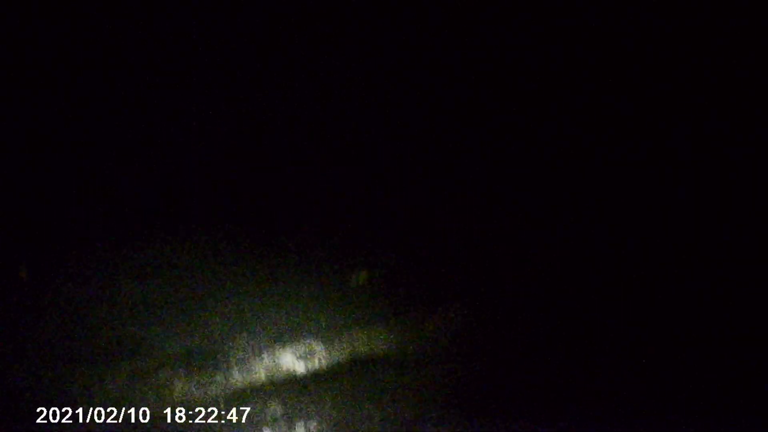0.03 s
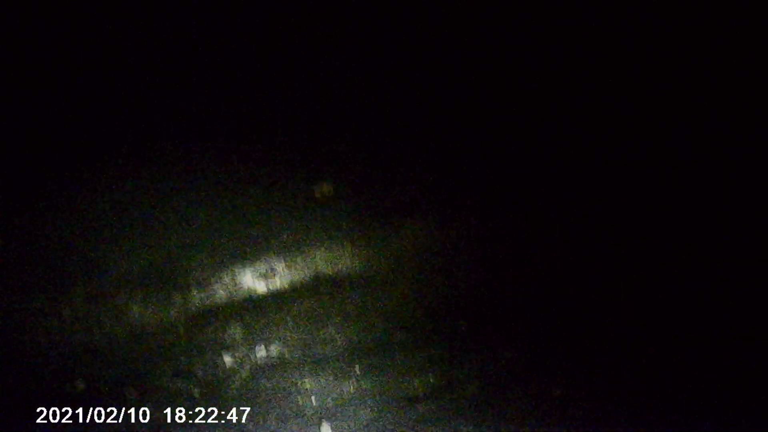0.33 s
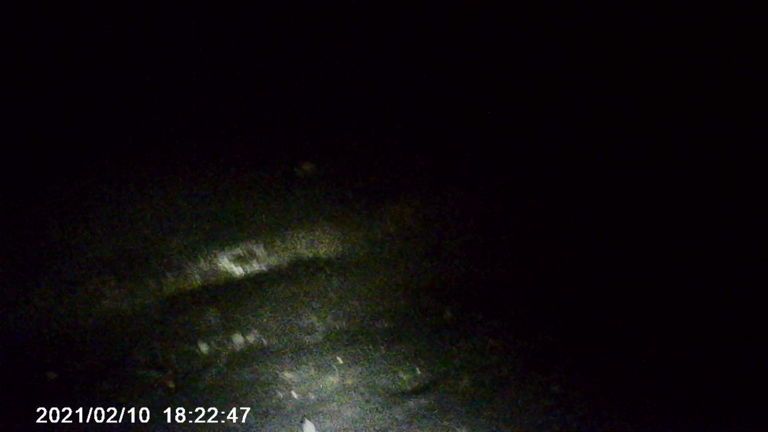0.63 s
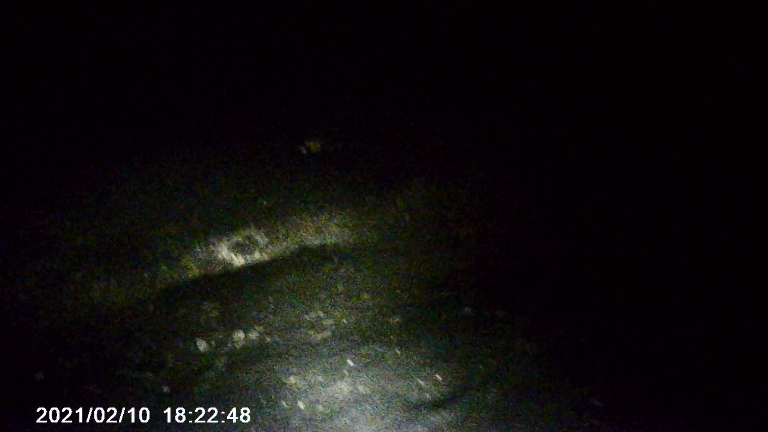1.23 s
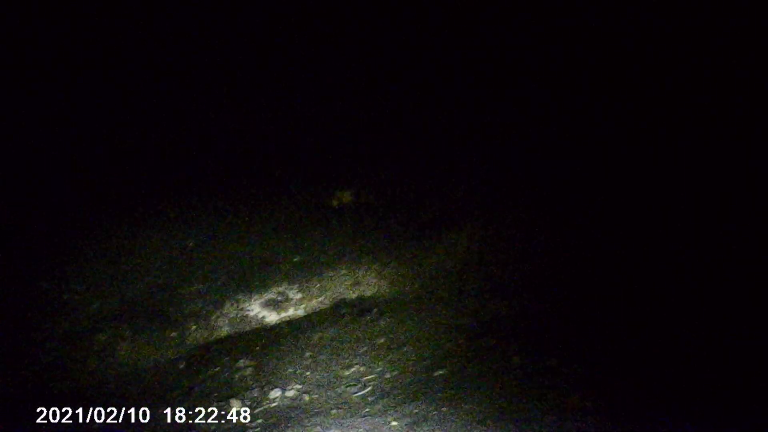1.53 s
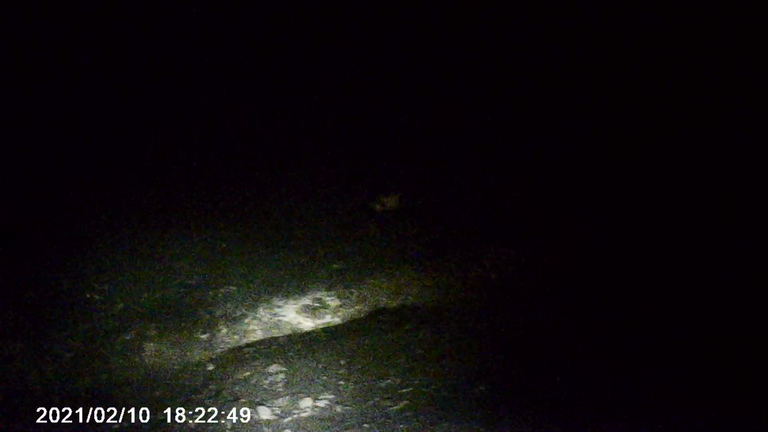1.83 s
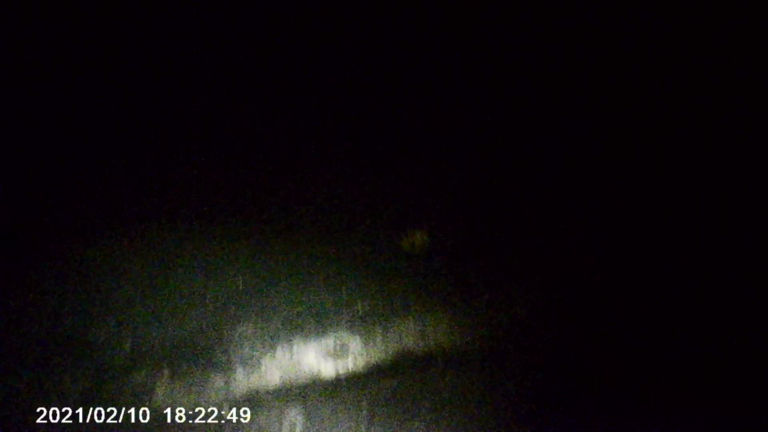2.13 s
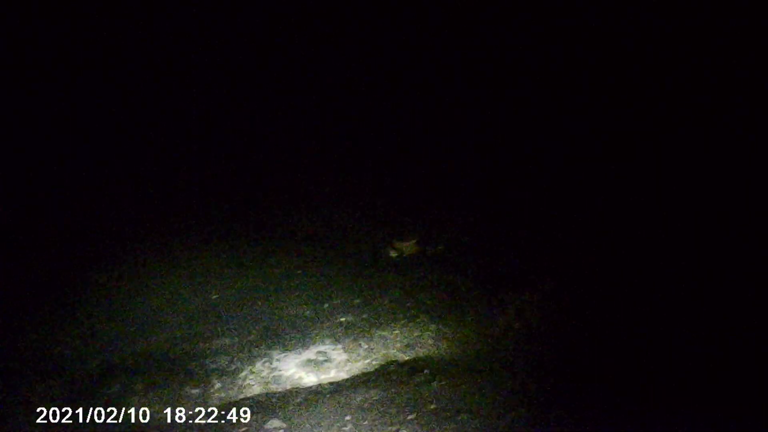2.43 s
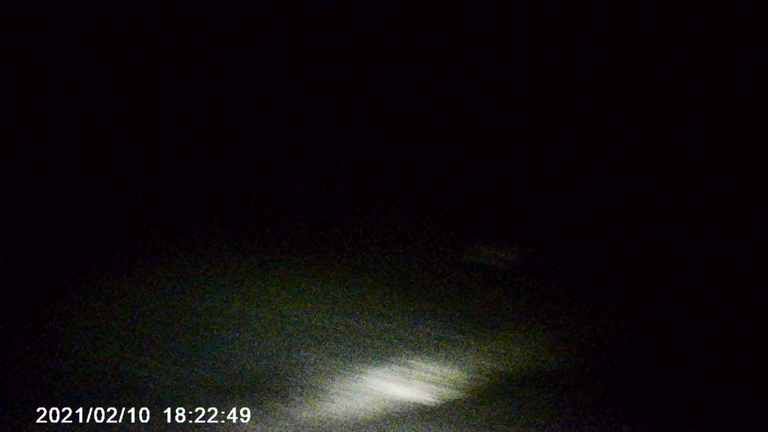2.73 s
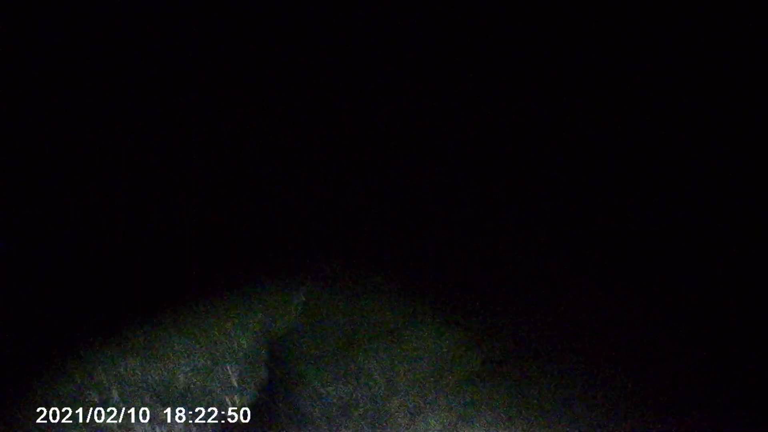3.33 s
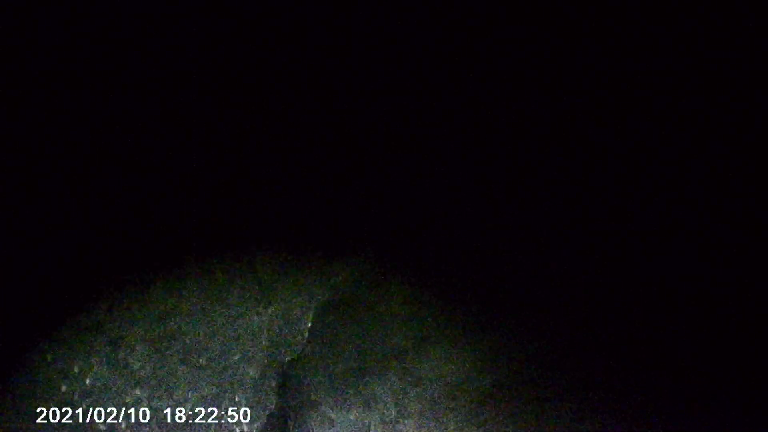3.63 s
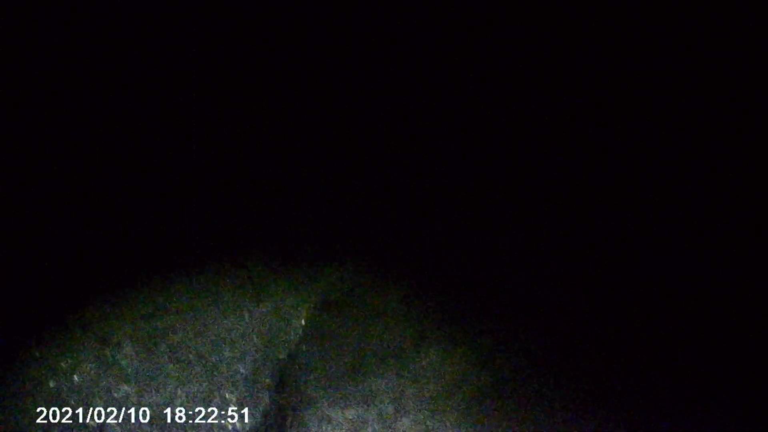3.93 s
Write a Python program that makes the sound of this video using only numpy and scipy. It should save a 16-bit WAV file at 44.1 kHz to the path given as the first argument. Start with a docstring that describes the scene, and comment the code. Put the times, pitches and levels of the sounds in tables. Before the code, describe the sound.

Dull low bumps, probably from steps, jolt a handheld camera in a quiet cave, close and dry. A light tick comes early, then a sharper click and brief creak, the strongest thump and last faint ticks, over steady microphone hiss.

```python
"""A silent cave, heard from the microphone of a small camera that someone carries slowly through it.
Microphone hiss and a faint handling rumble run throughout. From the start soft jolts, probably steps,
rock the camera as deep thumps, and its plastic case ticks right at the microphone. More thumps follow
after a second. Near 2 s come the sharpest tick and a short creak, at 2.6 s the strongest thump,
and just past 3 s a last soft one with a few faint ticks."""
import sys
import numpy as np
from scipy import signal
from scipy.fft import rfft, irfft
from scipy.io import wavfile

SR = 44100
rng = np.random.default_rng(int(sys.argv[2]) if len(sys.argv) > 2 else 0)


def inscribe(sig):
    """Save sig as 16-bit PCM at rate SR to the path in sys.argv[1].

    A 1-D sig is mono; a 2-D sig holds one channel per row.
    Samples are clipped to [-1, 1] before scaling.
    """
    pcm = np.round(np.clip(np.atleast_2d(sig).T, -1, 1) * 32767)
    wavfile.write(sys.argv[1], SR, pcm.astype(np.int16))


N = 176400

# Jolts of the camera. Each row: time of the peak in seconds, level in dB, pitch in Hz, decay in seconds.
JOLTS = [(0.023, -38, 33, 0.0073), (.233, -27.5, 28, 0.032), (0.385, -40.5, 35, 0.0075),
         (.62, -44.5, 16, 0.03), (1.114, -36.5, 30, 0.0063), (1.169, -38, 28, 0.038),
         (1.267, -44, 35, 0.048), (1.311, -45.5, 36, 0.011), (1.835, -50.5, 51, 0.018),
         (1.962, -32.5, 20, 0.03), (2.03, -35, 22.6, 0.022), (2.163, -43.5, 11.4, 0.017),
         (2.624, -26.5, 25.7, 0.024), (2.693, -44.5, 27.6, 0.072), (3.082, -45, 26, 0.019)]


def amp(db):
    """Decibels to gain."""
    return 10 ** (np.asarray(db) / 20)


def gain_at(spectrum, hz):
    """Gain of a curve of (Hz, dB) points, read on a log-frequency axis."""
    points_hz, db = np.transpose(spectrum)
    return amp(np.interp(np.log(hz + 1), np.log(points_hz + 1), db))


def add(mix, start_s, sound):
    """Mixes a sound in at its start time."""
    part = mix[round(start_s * SR):][:len(sound)]
    part += sound[:len(part)]


def noise(spectrum):
    """Steady noise of a given colour, rms 1."""
    gain = gain_at(spectrum, np.fft.rfftfreq(N, 1 / SR))
    coloured = irfft(rfft(rng.standard_normal(N)) * gain, N)
    return coloured / np.sqrt(np.mean(coloured ** 2) + 1e-20)


def minimum_phase(gain):
    """The most compact impulse response that has this gain per frequency."""
    log_gain = np.log(np.concatenate([gain, gain[-2:0:-1]]) + 1e-6)
    return np.fft.ifft(np.exp(np.conj(signal.hilbert(log_gain)))).real


def microphone_hiss(level_db=-70):
    """The microphone's own steady noise, bare in the silence of the cave."""
    # Colour of the hiss. Each row: frequency in Hz, relative density in dB.
    hiss_colour = [(20, -11.5), (100, 0), (200, 0.5), (400, -4.5), (800, -10), (1600, -13.5), (3200, -17),
                   (4300, -17), (5200, -18.5), (7000, -19), (7800, -26), (8500, -31.5)]
    return amp(level_db) * noise(hiss_colour)


def handling_rumble(rest_db=-57, lift_db=7.5, swell_s=0.05):
    """The hand on the camera makes a low rumble that swells at each jolt, by lift_db at the strongest."""
    # Colour of the rumble. Each row: frequency in Hz, relative density in dB.
    rumble_colour = [(4, -11), (14, 4), (25, -5.5), (40, -10.5), (60, -11.5), (100, -20), (160, -29),
                     (300, -44), (900, -90)]
    t = np.arange(N) / SR
    top_db = max(db for _, db, _, _ in JOLTS)
    motion = sum(amp(db - top_db) * np.exp(-((t - peak_s) / swell_s) ** 2) for peak_s, db, _, _ in JOLTS)
    return amp(rest_db) * (1 + (amp(lift_db) - 1) * motion) * noise(rumble_colour)


def case_ticks(size=2048):
    """Tiny slips knock the plastic case and scatter inside it; a softer contact makes a duller tick."""
    # Slips, a creak when close together. Each row: start in seconds, peak level in dB, brightness in Hz.
    slips = [(.2405, -57.5, 1200), (.3500, -42.5, 2200), (.3640, -56, 2000), (1.9586, -27.5, 5640),
             (2.0714, -31.5, 2100), (2.0779, -37, 2300), (2.0866, -49.5, 1700), (2.0888, -78, 1600),
             (2.1028, -47.5, 2200), (2.633, -61, 1200), (2.7270, -51, 700), (3.1338, -46, 1800),
             (3.1405, -52, 1900), (3.1532, -60, 1500)]
    # Colour of a knock on the case. Each row: frequency in Hz, relative level in dB.
    knock_colour = [(60, -28), (330, -13), (490, -3), (750, -2), (1250, -3), (2000, 1), (2600, -5),
                    (3600, -7.5), (4300, 1), (4900, -8.5), (5650, -23.5), (8000, -53)]
    # Ringing of the case. Each row: frequency in Hz, level against the knock in dB, t60 in seconds.
    case_modes = [(540, -36, .016), (750, -22.5, .015), (1180, -27.5, .011), (1520, -21, .01),
                  (1870, -19.5, .011), (2300, -32, .008), (3020, -24, 0.018), (4150, -22, .007),
                  (4600, -16.5, .007)]
    contact_order, contact_leak_db = 5.9, -19.5
    scatter_db, scatter_t60_s, scatter_rise_s = -8.5, 0.0091, 0.0008
    hz = np.fft.rfftfreq(size, 1 / SR)
    t = np.arange(size) / SR
    knock = minimum_phase(gain_at(knock_colour, hz))
    knock /= abs(knock).max()
    ring = sum(amp(db - 60 * t / t60) * np.sin(2 * np.pi * f * t) for f, db, t60 in case_modes)
    scatter_envelope = np.minimum(t / scatter_rise_s, 1) ** 2 * amp(-60 * t / scatter_t60_s)
    out = np.zeros(N)
    for start_s, db, bright_hz in slips:
        reflections = rng.standard_normal(size) * scatter_envelope
        scatter = signal.fftconvolve(knock, reflections / np.linalg.norm(reflections))[:size]
        lowpass = 1 / np.sqrt(1 + (hz / bright_hz) ** (2 * contact_order))
        contact = minimum_phase(lowpass + amp(contact_leak_db))
        tick = signal.fftconvolve(knock + ring + amp(scatter_db) * scatter, contact)[:size]
        add(out, start_s, amp(db) * tick / abs(tick).max())
    return out


def jolt_thumps(rise_cycles=0.5, rounding_s=0.0052):
    """Each jolt swells within a cycle, rocks the camera slowly and dies away: a deep thump."""
    out = np.zeros(N)
    for peak_s, db, hz, decay_s in JOLTS:
        t = np.arange(N) / SR - peak_s
        rise = np.exp(-(np.minimum(t, 0) * hz / rise_cycles) ** 2)
        eased_s = np.hypot(np.maximum(t, 0), rounding_s) - rounding_s  # rounds off the peak
        fall = np.exp(-eased_s / decay_s)
        out += amp(db) * rise * fall * np.cos(2 * np.pi * hz * t)
    return out


def scene():
    """Ticks, thumps, rumble and hiss, all close and dry at the camera's one microphone."""
    return (case_ticks() + jolt_thumps() + handling_rumble() + microphone_hiss())[None]


def record(dry):
    """The camera's converter limits the band and sits slightly off zero."""
    edge_hz, dc_offset = 8400, 0.0058
    lowpass = signal.firwin(255, edge_hz, window=("kaiser", 8), fs=SR)
    return signal.oaconvolve(dry, lowpass[None], "same") + dc_offset


dry = scene()
out = record(dry)
inscribe(out)
```